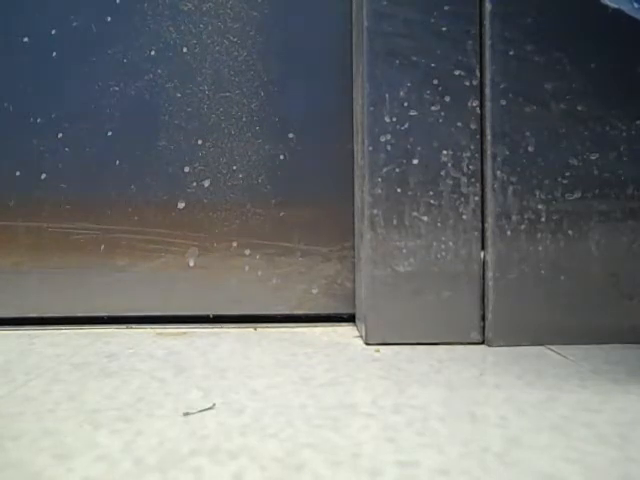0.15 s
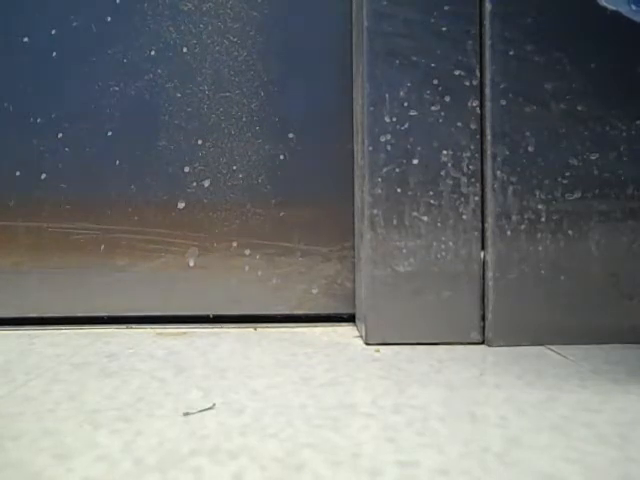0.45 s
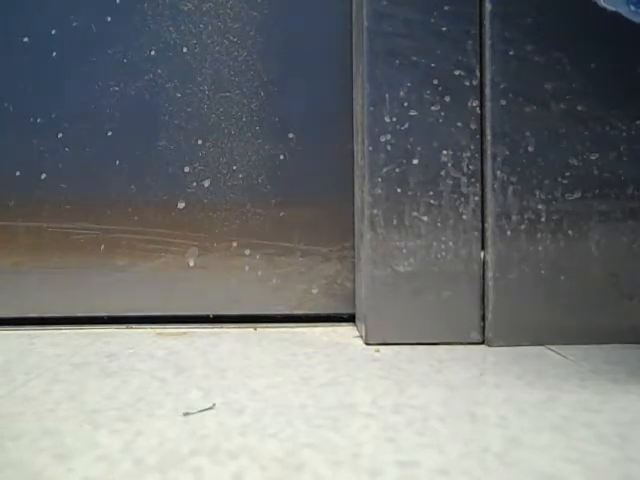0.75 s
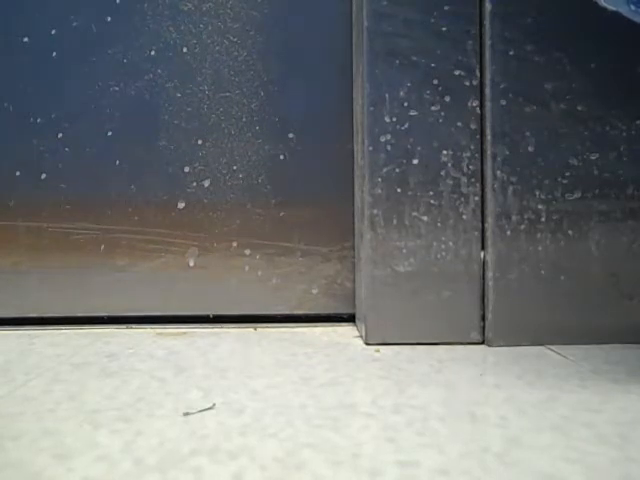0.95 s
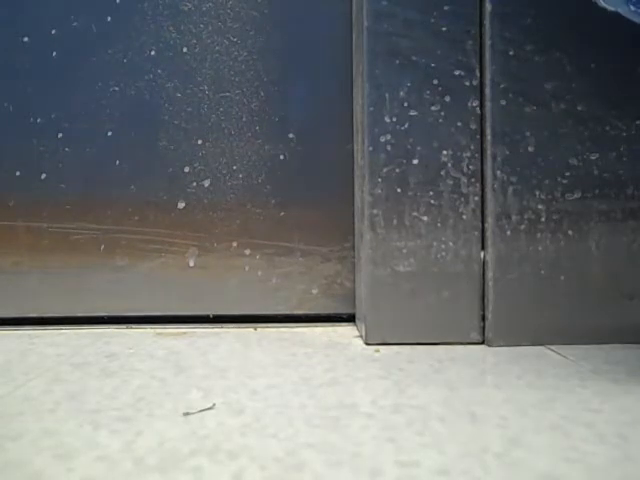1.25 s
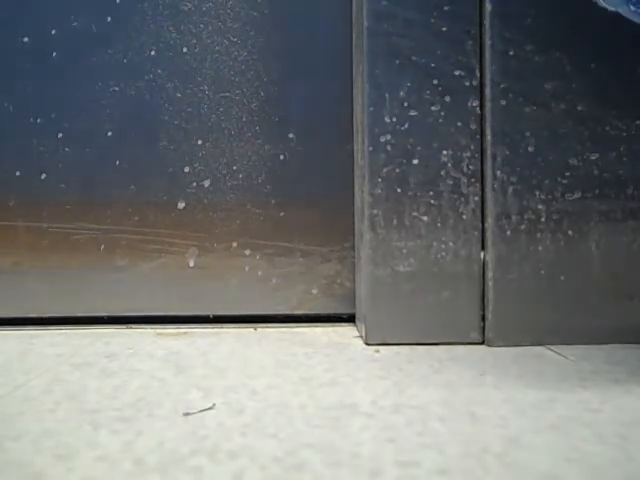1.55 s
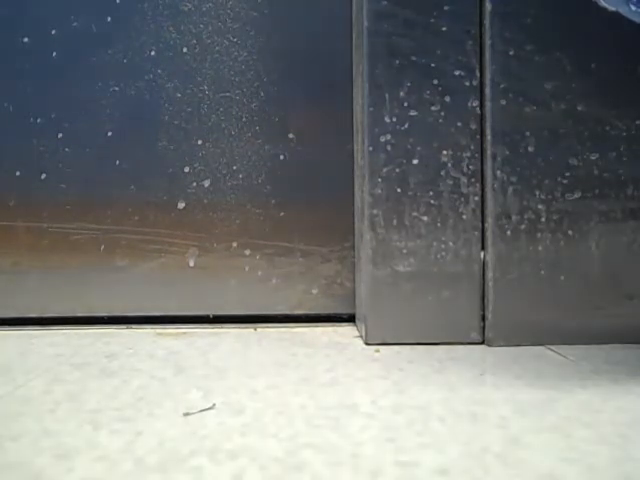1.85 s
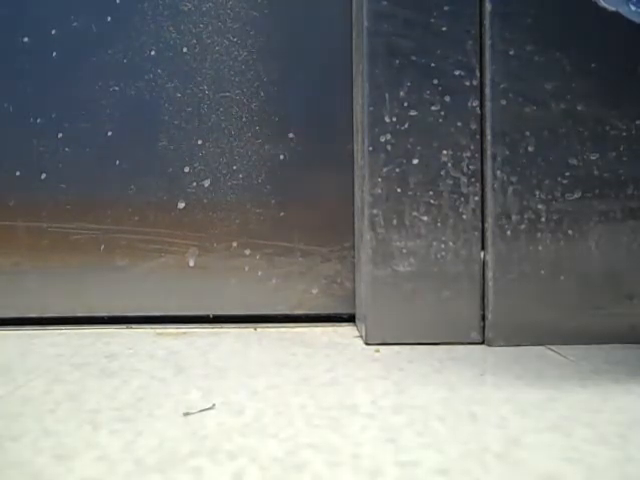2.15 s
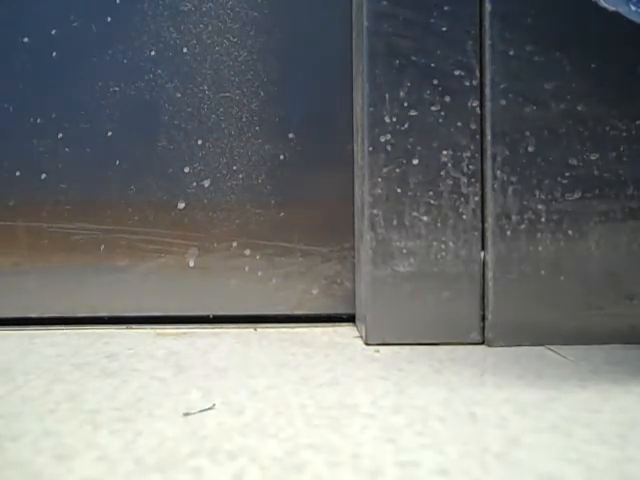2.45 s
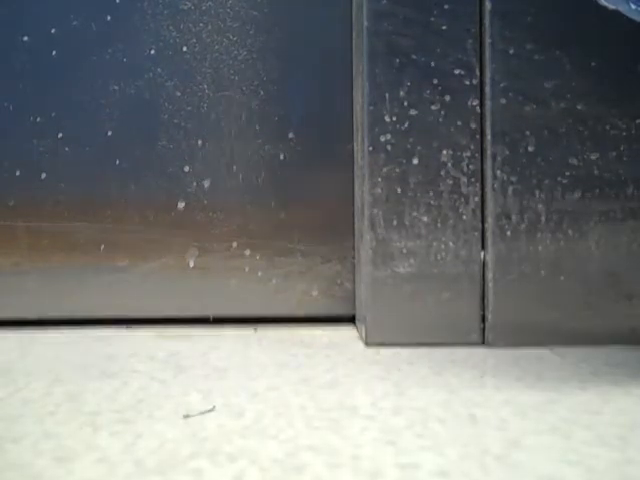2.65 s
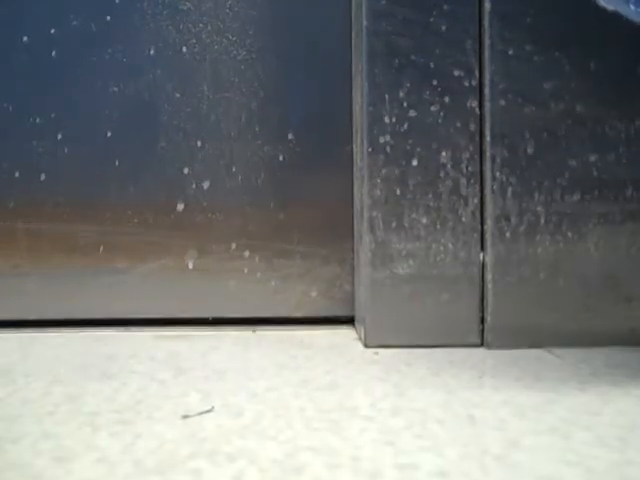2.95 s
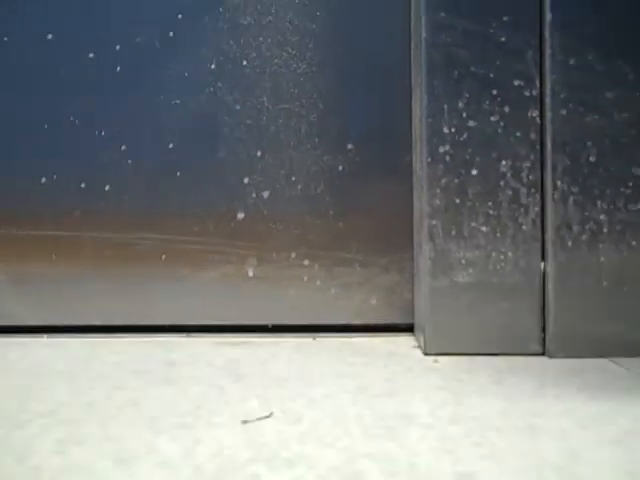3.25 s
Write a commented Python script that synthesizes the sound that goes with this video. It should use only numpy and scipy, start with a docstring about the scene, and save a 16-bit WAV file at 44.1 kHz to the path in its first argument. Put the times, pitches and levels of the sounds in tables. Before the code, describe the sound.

Hydraulic elevator pump hums steadily inside a moving cab, with low rumble and soft air hiss; two sharp metal ticks come early, then a light brushing and faint scuffs, heard close to the steel door.

```python
"""Inside a moving hydraulic elevator cab, close to the foot of its steel door.
Throughout, pump harmonics hum, noise-driven cab resonances rumble and coloured noise hisses as air.
Metal ticks sharply twice (cracks, decaying modes, noise tails); then a thin rustle rises and something
brushes softly past (grainy noise). Late on, a faint tick beside a short scuff, a second scuff and
a last faint tick."""
import sys
import numpy as np
from scipy import signal
from scipy.fft import rfft, irfft
from scipy.io import wavfile

SR = 44100
rng = np.random.default_rng(int(sys.argv[2]) if len(sys.argv) > 2 else 0)


def unload_wav(signal):
    """Save mono or channel-first audio to the path in sys.argv[1] as 16-bit WAV at rate SR, clipped to [-1, 1]."""
    wavfile.write(
        sys.argv[1],
        SR,
        np.round(np.clip(np.atleast_2d(signal).T, -1, 1) * 32767).astype(np.int16),
    )


N = 149940
T = np.arange(N) / SR
HZ = np.maximum(np.fft.rfftfreq(N, 1 / SR), 1)


def from_db(db):
    """Decibels to amplitude gain."""
    return 10 ** (np.asarray(db) / 20)


def rms_one(x):
    """Scale to unit rms."""
    return x / np.sqrt(np.mean(x ** 2) + 1e-20)


def in_time(rows):
    """Control curve, linear between rows, at every sample."""
    return np.interp(T, *np.transpose(rows))


def in_hz(rows):
    """Spectral curve, linear over log frequency, at every FFT bin."""
    hz, value = np.transpose(rows)
    return np.interp(np.log(HZ), np.log(hz), value)


def drift(corner_hz):
    """Low-passed noise without DC: random wander of unit rms."""
    lowpass = (HZ > 1) / (1 + (HZ / corner_hz) ** 2)
    return rms_one(irfft(rfft(rng.standard_normal(N)) * lowpass, N))


def diffuse(gain):
    """Stereo noise of a given colour, alike in the bass, mostly unrelated in the treble; unit rms."""
    # left-right likeness of diffuse sound: f/Hz, correlation
    likeness = [(40, 0.56), (250, 0.85), (600, 0.98), (1300, 0.78), (2900, 0.51), (6200, 0.0026),
                (13000, 0.085)]
    mid, side = rfft(rng.standard_normal((2, N)))
    alike = np.clip(in_hz(likeness), -1, 1)
    common = np.sqrt(1 + alike) * mid
    opposed = np.sqrt(1 - alike) * side * [[1], [-1]]
    return rms_one(irfft(gain * (common + opposed), N))


def dying(start_s, t60_s):
    """Instant attack, exponential decay by 60 dB per t60."""
    return (T >= start_s) * np.exp(-np.log(1000) * np.clip((T - start_s) / t60_s, 0, 10))


def tone(phase, waver):
    """Unit-rms partial whose level and phase waver as the cab shakes."""
    waver_hz = 14
    shake = (drift(waver_hz) + 1j * drift(waver_hz)) * waver
    start_phase = rng.uniform(0, 2 * np.pi)
    return rms_one(np.real((1 + shake) * np.exp(1j * (phase + start_phase))))


def pump():
    """Harmonics of the pump's pressure pulses, the lowest beating with mains hum; motor tone below."""
    # pump pulse rate: t/s, f/Hz
    pulse_rate = [(0, 114.1), (.65, 114.2), (1.0, 115.0), (1.4, 115.6), (1.85, 115.1), (2.15, 114.5),
                  (2.45, 115.5), (2.85, 115.3), (3.1, 115.9), (3.4, 115.7)]
    # second harmonic, the strongest: t/s, level/dB
    drone = [(0, -33.5), (.55, -35.5), (1.3, -33), (1.39, -33.5), (1.5, -32.5), (1.76, -29.5),
             (1.95, -32.5), (2.11, -29), (2.24, -35), (2.39, -30), (2.56, -33), (2.76, -30), (2.87, -32.5),
             (2.97, -32), (3.14, -28.5), (3.26, -30.5), (3.3, -31.5), (3.35, -28)]
    # fifth harmonic, a whine: t/s, level/dB
    whine = [(0, -54), (.2, -55.5), (.52, -47.5), (.8, -58), (1.6, -57.5), (2.3, -58.5), (2.7, -49),
             (2.9, -54.5), (3.4, -52)]
    # other harmonics: multiple of pulse rate, level/dB, waver share
    partials = [(3, -44.5, 0.7), (4, -60.5, 1), (6, -66, 0.33), (7, -61.5, 0.4), (8, -68, 0.55),
                (9, -64.5, .6), (10, -70, 0.76), (11, -68, 0.77), (15, -79, .6)]
    pulse_db, motor_db, motor_hz = -40.5, -56, 59.2
    mains_hz, throb_share, throb_swell_s = 120, .22, 2.36

    phase = 2 * np.pi * np.cumsum(in_time(pulse_rate)) / SR
    beat = 2 * np.pi * mains_hz * T - phase
    swell_beat = np.interp(throb_swell_s, T, beat)  # throb peaks at this time
    throb = 1 + throb_share * np.cos(beat - swell_beat)
    hum = from_db(pulse_db) * throb * tone(phase, waver=.08)
    hum = hum + from_db(in_time(drone)) * tone(2 * phase, waver=.1)
    hum = hum + from_db(in_time(whine)) * tone(5 * phase, waver=.3)
    for multiple, db, waver in partials:
        hum = hum + from_db(db) * tone(round(multiple) * phase, waver)
    return hum + from_db(motor_db) * tone(2 * np.pi * motor_hz * T, waver=.25)


def cab():
    """The ride stirs the cab's resonances as noise bands; air hisses steadily."""
    # cab resonances: f/Hz, nominal width/Hz, level before ride curve/dB
    resonances = [(85.6, 11.5, -51), (148.7, 27, -48), (198.5, 22, -52.5), (237.7, 18, -48),
                  (270.8, 27, -47), (314, 16.3, -49), (345, 44, -48.5), (404, 21, -51), (439, 4.9, -54),
                  (463.6, 25, -53), (499.7, 13, -54), (673.6, 21, -57), (768, 17, -59.5),
                  (830.4, 27, -56.5), (894, 13, -62.5), (1317, 13, -69), (2570, 88, -69.5)]
    # rumble gain over the ride: t/s, level/dB
    ride = [(0, -1.5), (.2, 0.5), (.43, 1.5), (.55, 0), (1.1, 0), (1.42, 1.5), (1.58, 1), (1.65, 5),
            (1.75, 1.5), (1.95, -1), (2.8, 0), (3.15, 1.5), (3.4, 0)]
    # steady air and running noise: f/Hz, relative density/dB per Hz
    air_colour = [(12, -25), (28, -1), (70, 0.5), (180, -7), (400, -6.5), (580, -3.5), (900, -11),
                  (1150, -14), (2000, -19.5), (2800, -23.5), (3600, -29), (6000, -30), (8000, -33),
                  (10000, -42), (14000, -46)]
    air_db = -46

    power = 0
    for hz, width_hz, db in resonances:
        peak = 1 / (1 + ((HZ - hz) / (width_hz * 0.74)) ** 2)
        power = power + (from_db(db) * rms_one(peak)) ** 2
    rumble = np.sqrt(power.mean()) * diffuse(np.sqrt(power))
    air = from_db(air_db) * diffuse(from_db(in_hz(air_colour)))
    return from_db(in_time(ride)) * rumble + air


def ticks():
    """Each metal tick is a crack, a few ringing modes and a short tail between the steel walls."""
    # ticks: t/s, level/dB, relative ring level/dB, tail t60/s
    tick_rows = [(0.5233, -44.5, -3.5, 0.13), (0.8458, -41, -12.5, 0.18), (2.742, -52, -6, 0.02),
                 (3.178, -54.5, -10, .05)]
    # modes of the ticking part: f/Hz, relative level/dB, longest t60/s
    modes = [(5760, -13, .12), (6730, -7, .1), (6800, 0, .12), (6890, -5, .1), (7000, -4, .1),
             (7720, -12, .09)]
    # crack: f/Hz, relative density/dB per Hz
    crack_colour = [(1500, -19), (3000, -7), (5000, -14), (6800, 0), (8500, -5), (10000, -10), (14000, -7)]
    # tail: f/Hz, relative density/dB per Hz
    tail_colour = [(1500, -32), (3000, -20), (5300, -16), (5700, -1), (6150, -9.5), (6900, 5.5),
                   (7300, -11), (7800, -1.5), (8800, -5.5), (9900, -20), (11400, -24), (14000, -22)]
    crack_db, crack_t60_s = 1, .025  # level relative to tail

    out = 0
    crack = diffuse(from_db(in_hz(crack_colour)))
    tail = diffuse(from_db(in_hz(tail_colour)))
    for start_s, db, ring_db, t60_s in tick_rows:
        ring = 0
        for hz, mode_db, mode_t60_s in modes:
            decay = dying(start_s, min(mode_t60_s, t60_s * 1.2))
            cycles = hz * T + rng.random() + .3 * rng.random((2, 1))  # phase differs left to right
            ring = ring + from_db(mode_db) * decay * np.sin(2 * np.pi * cycles)
        snap = from_db(crack_db) * crack * dying(start_s, crack_t60_s)
        burst = (snap + tail * dying(start_s, t60_s)) / 2
        out = out + from_db(db) * (burst + from_db(ring_db) * ring)
    return out


def brushing():
    """Light, grainy friction as noise: a thin rustle, one long pass and two short scuffs."""
    # thin, airy rustle: t/s, level before grain/dB
    rustle = [(1.15, -82), (1.28, -62.5), (1.35, -73), (1.55, -64), (1.66, -58), (1.71, -63), (1.83, -61.5),
              (2.05, -66.5), (2.5, -70), (3.0, -73), (3.12, -63.5), (3.4, -70.5)]
    # rustle: f/Hz, relative density/dB per Hz
    rustle_colour = [(1500, -11), (3000, 0.5), (6000, 3.5), (7500, 4), (9000, -2.5), (11000, -9.5),
                     (14000, -9)]
    # long soft pass: t/s, level before grain/dB
    brush = [(1.3, -75), (1.38, -61.5), (1.43, -61.5), (1.46, -55.5), (1.52, -58), (1.59, -54.5),
             (1.62, -57), (1.66, -60), (1.72, -80)]
    # long pass: f/Hz, relative density/dB per Hz
    brush_colour = [(900, -26), (1900, 5), (2500, -5.5), (3500, -10), (4000, 3.5), (4600, -7.5),
                    (5100, -1.5), (5800, -5), (6700, 2), (7300, -6.5), (9500, -14.5), (14000, -25)]
    # scuffs: centre t/s, half length (to 1/e)/s, level before grain/dB, left minus right/dB
    scuffs = [(2.712, .025, -62.5, 1), (2.999, 0.022, -56, -9)]
    # scuffs: f/Hz, relative density/dB per Hz
    scuff_colour = [(1500, -13), (3000, 4), (5000, 3.5), (6500, 1), (8000, 4.5), (9500, -13),
                    (14000, -21.5)]
    grain_rms_db, grain_corner_hz = 1, 75

    out = from_db(in_time(brush)) * diffuse(from_db(in_hz(brush_colour)))
    out = out + from_db(in_time(rustle)) * diffuse(from_db(in_hz(rustle_colour)))
    friction = diffuse(from_db(in_hz(scuff_colour)))
    for centre_s, half_s, db, pan_db in scuffs:
        side_gain = from_db(db + np.array([[pan_db], [-pan_db]]) / 2)
        out = out + friction * side_gain * np.exp(-((T - centre_s) / half_s) ** 2)
    return out * from_db(grain_rms_db * drift(grain_corner_hz))


def scene():
    """Everything heard in the cab."""
    return pump() + cab() + ticks() + brushing()


def record(dry):
    """Microphone ports ring in the treble; left is thinner and brighter; the top is cut."""
    # port resonances, left then right: f/Hz, width/Hz, boost/dB
    ports = [(7490, 1320, 6), (6500, 720, 5.5)]
    # left minus right sensitivity: f/Hz, level/dB
    mic_balance = [(30, -5), (65, -0.5), (125, -8), (200, -1.5), (600, -.5), (950, -2), (1300, -.3),
                   (4000, -.7), (6200, -3), (7900, 5), (10000, 4), (14000, 2)]
    cutoff_hz, fade_s = 14200, .004

    ported = []
    for x, (hz, width_hz, boost_db) in zip(dry, ports):
        resonance = signal.lfilter(*signal.iirpeak(hz, hz / width_hz, fs=SR), x)
        ported.append(x + (from_db(boost_db) - 1) * resonance)
    fade = np.clip(np.minimum(T, T[-1] - T) / fade_s, 0, 1)
    side_gain = from_db(in_hz(mic_balance) * [[1], [-1]] / 2)
    heard = irfft(rfft(fade * ported) * side_gain, N)
    # 0.1 dB ripple, 80 dB stopband
    return signal.sosfilt(signal.ellip(12, .1, 80, cutoff_hz, fs=SR, output="sos"), heard)


dry = scene()
out = record(dry)
unload_wav(out)
```